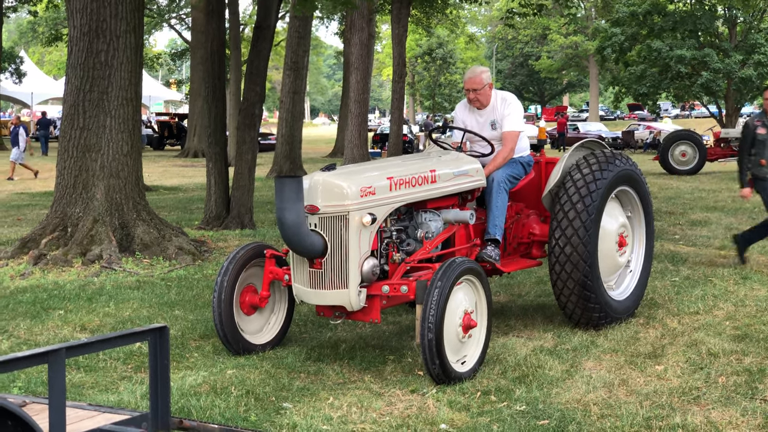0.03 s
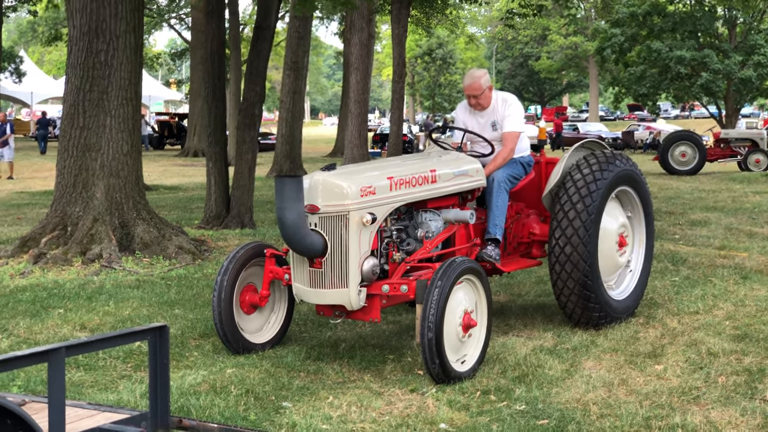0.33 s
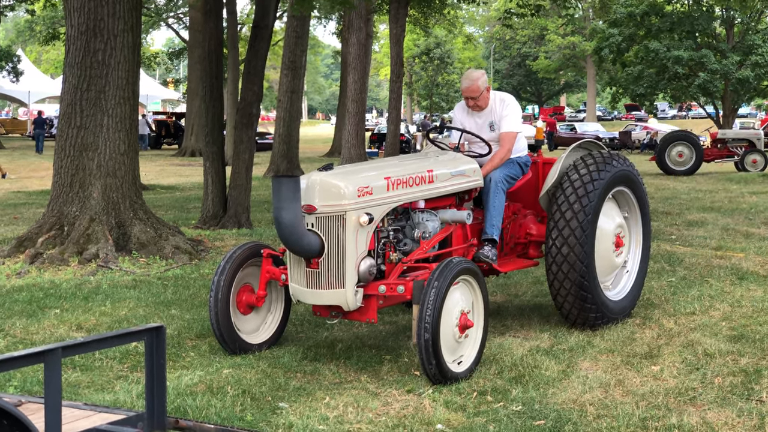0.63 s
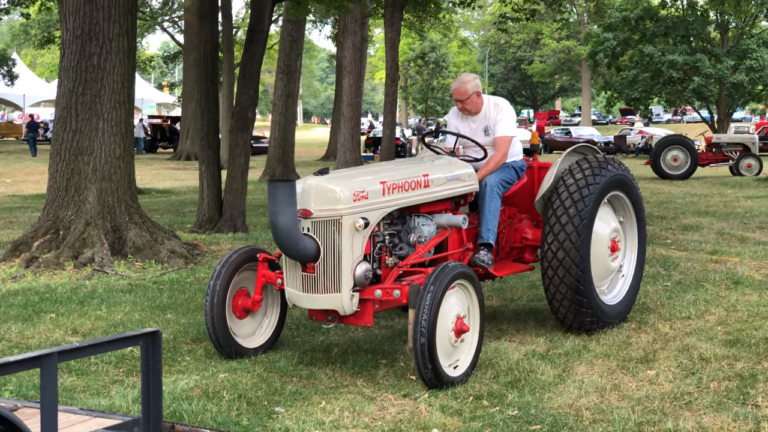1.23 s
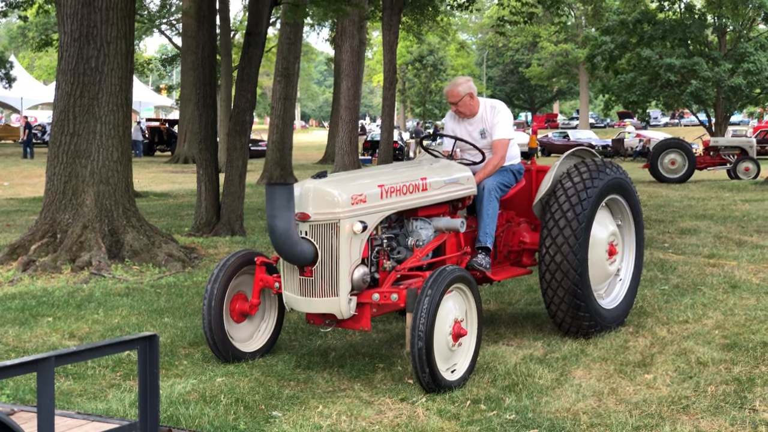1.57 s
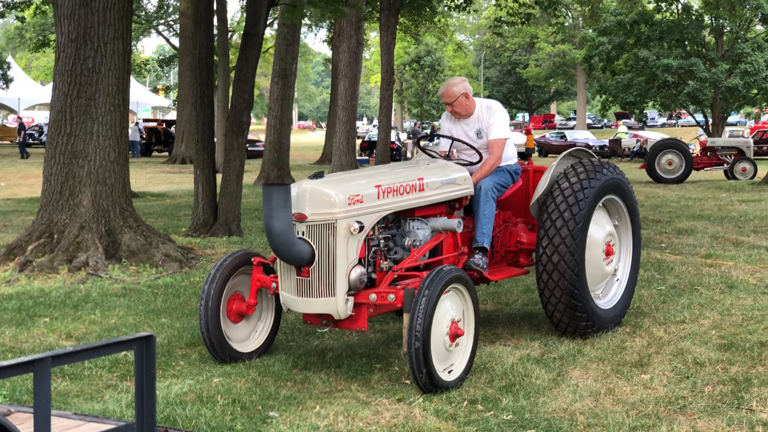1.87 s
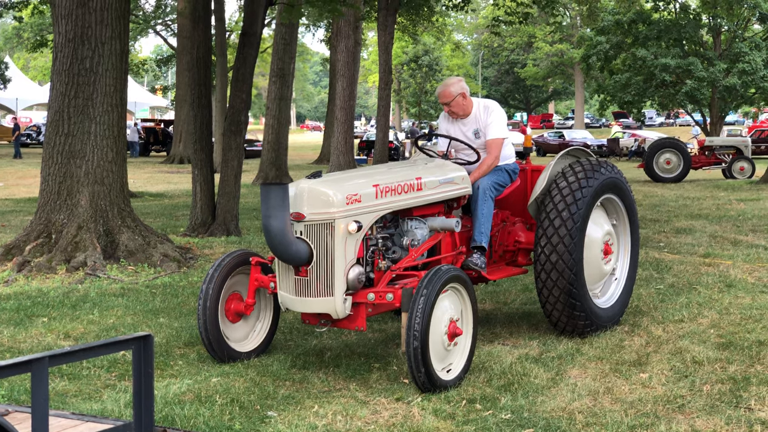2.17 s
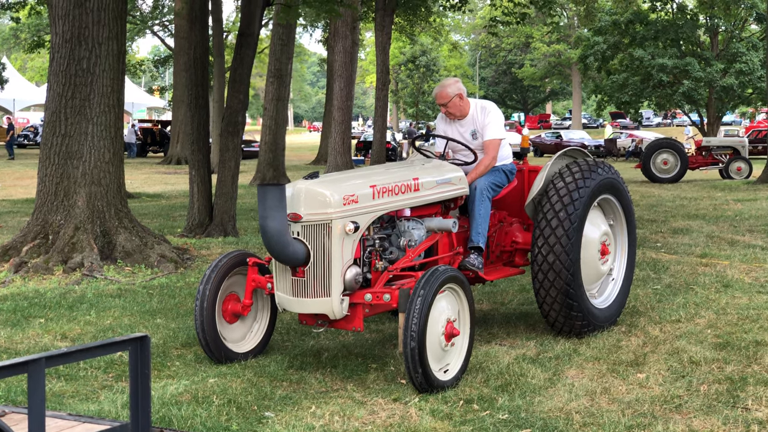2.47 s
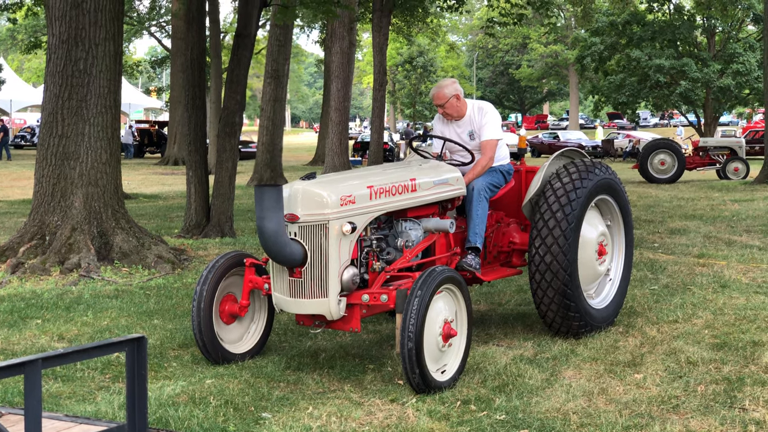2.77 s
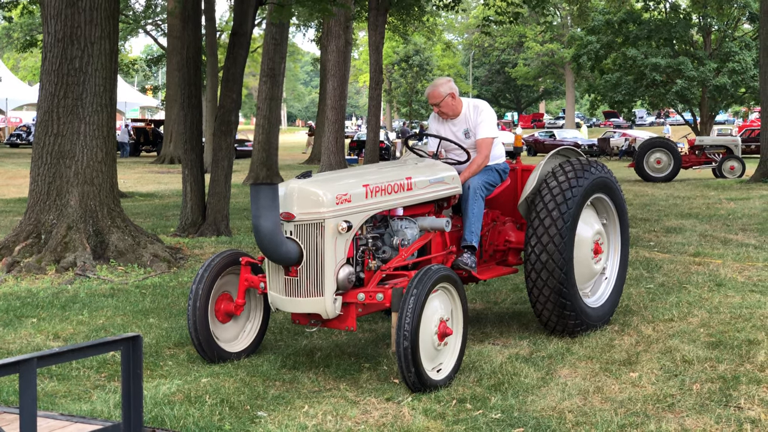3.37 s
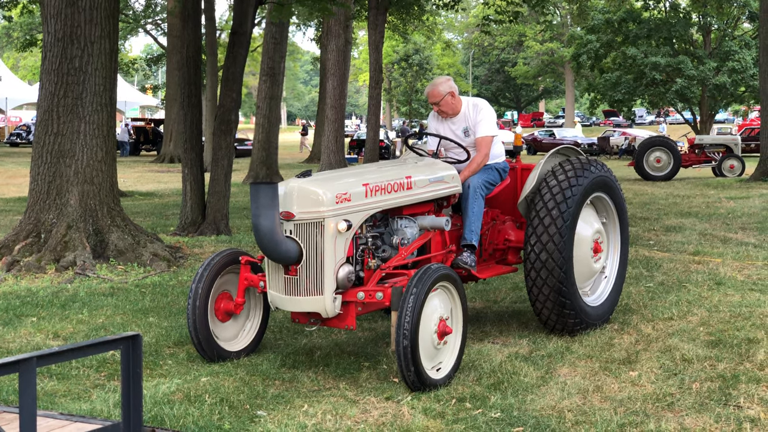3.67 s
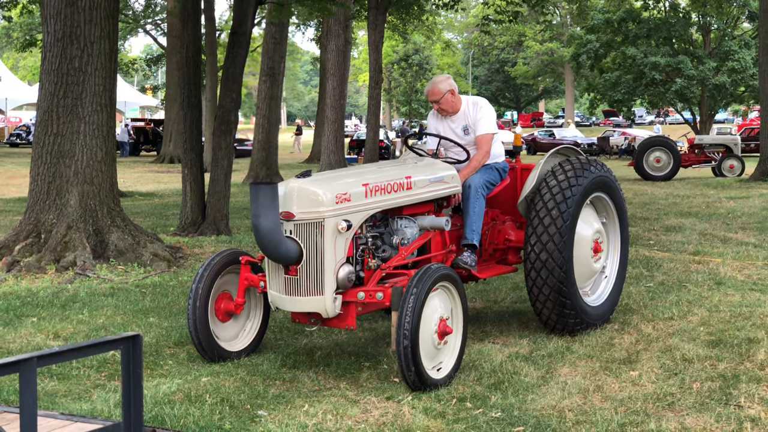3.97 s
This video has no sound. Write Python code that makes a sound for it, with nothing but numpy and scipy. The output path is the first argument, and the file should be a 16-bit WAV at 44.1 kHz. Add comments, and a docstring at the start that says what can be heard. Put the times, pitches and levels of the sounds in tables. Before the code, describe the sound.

A small gas turbine in a tractor spools up on a lawn, a few metres away. From the start, a high whine climbs over a steady rushing roar and hiss, rising about an octave in four seconds. The whine flutters in and out, strengthens from about 1.7 seconds and is loudest around 2.7 to 3.3. Faint low hums lie underneath, and a thin, higher whistle emerges near 3.5 seconds.

```python
"""On a lawn, a few metres away, a small gas turbine in a tractor spools up.
The compressor's blade-passing whine climbs with the shaft, swelling and fading as it sweeps.
Turbulent gas in the ducts makes the exhaust roar and intake hiss. Beneath them: weaker shaft orders,
a higher blade whistle, a rasp and low hums. A gain control turns down when the whine peaks."""
import sys
import numpy as np
from scipy import signal
from scipy.fft import rfft, irfft
from scipy.io import wavfile
from scipy.ndimage import uniform_filter1d

SR = 44100
rng = np.random.default_rng(int(sys.argv[2]) if len(sys.argv) > 2 else 0)


def master_out(mix):
    """Clip the mix to full scale and print it as 16-bit PCM to the path in sys.argv[1]."""
    frames = np.transpose(np.atleast_2d(mix))
    ceiling = np.clip(frames, -1, 1)
    pcm = np.round(ceiling * 32767).astype(np.int16)
    wavfile.write(sys.argv[1], SR, pcm)


N = 176400
TIME_S = np.arange(N) / SR

# shaft speed: time_s, speed_rev_per_s
SHAFT_SPEED = [(0, 176.0), (0.1, 181), (0.25, 192), (0.5, 204.5), (0.8, 219), (1.1, 230), (1.5, 247.7),
               (1.9, 262), (2.3, 276.2), (2.75, 292.6), (3.05, 302.2), (3.3, 311.2), (3.58, 322),
               (3.8, 331.8), (4, 339.6)]
# blade-passing whine: time_s, level_db
WHINE_LEVEL = [(.02, -25), (.065, -36), (.13, -27), (.24, -40), (.33, -23), (.41, -19.5), (.45, -22),
               (.54, -19), (.63, -25), (.73, -23.5), (.765, -39), (.81, -29.5), (1.09, -28), (1.15, -37),
               (1.21, -25.5), (1.33, -33), (1.44, -40), (1.52, -29.5), (1.58, -21.5), (1.63, -48),
               (1.68, -19.5), (1.72, -18.5), (1.78, -28.5), (1.83, -19.5), (1.89, -16.5), (1.93, -19.5),
               (1.975, -15), (2.02, -30.5), (2.12, -18.5), (2.18, -30), (2.23, -16.5), (2.31, -14.5),
               (2.35, -19.5), (2.54, -12), (2.62, -26.5), (2.68, -8), (2.8, -5.5), (2.86, -10.5),
               (2.95, -10), (3.06, -10.5), (3.097, -20.5), (3.12, -10.5), (3.18, -8), (3.23, -11),
               (3.29, -11), (3.34, -27), (3.41, -13.5), (3.56, -23), (3.68, -15), (3.74, -17), (3.795, -12),
               (3.89, -15), (3.945, -14), (3.99, -20.5)]
# octave of the whine: time_s, level_db
OCTAVE_LEVEL = [(0, -44), (.25, -40), (.42, -37), (.47, -24.5), (.55, -27), (.65, -43), (.92, -34.5),
                (1, -31), (1.18, -37), (1.5, -39), (1.62, -25), (1.75, -35.5), (1.88, -42), (1.94, -34.5),
                (2.25, -36), (2.33, -30.5), (2.58, -33.5), (2.68, -23.5), (2.82, -28), (2.9, -24),
                (3.18, -28.5), (3.24, -39), (3.33, -30.5), (3.62, -35), (3.77, -24), (3.86, -41),
                (3.96, -26.5)]
# exhaust roar and intake hiss: frequency_hz, relative_density_db
ROAR_SPECTRUM = [(20, -52), (40, -26), (58, -1.5), (95, -1.5), (120, -4), (170, -7.5), (225, -2.5),
                 (260, -7.5), (310, -13), (430, -17), (520, -4.5), (660, -7), (800, -11), (920, -7.5),
                 (1120, -10), (1290, -8), (1460, -16), (1650, -8.5), (2100, -13), (2700, -15.5),
                 (3100, -13), (3500, -13.5), (4000, -11.5), (4700, -10.5), (5500, -14.5), (6200, -12),
                 (7100, -18.5), (9000, -18), (11000, -24.5), (15500, -28.5)]
# spectral change with shaft speed: frequency_hz, db_per_doubling
ROAR_TILT = [(60, -9), (300, -1), (600, -5), (1200, -1), (2500, -3.5), (4200, 1), (6000, -0.5), (9000, 5.5),
             (15000, 8)]
# roar: time_s, level_db
ROAR_LEVEL = [(0, -27.5), (.6, -27.5), (1.2, -25.5), (2, -24.5), (2.6, -23.5), (3, -23.5), (3.5, -24.5),
              (4, -24.5)]
# weaker tones: multiple of shaft speed
ORDERS = [.578, 1, 2, 16, 23, 24, 45, 46, 60]
# one row per order: level_db at nine even steps, start to end
ORDER_LEVELS = [(-42, -52, -51, -37, -46, -39, -41, -34.5, -31.5),
                (-43, -46.5, -37, -49, -41, -47, -50, -61.5, -42),
                (-52, -59, -55, -61, -37, -60, -52, -44, -46),
                (-60, -48, -53, -54, -57, -39, -36, -57, -48),
                (-40.5, -41, -43, -41, -47, -52, -50, -49, -54),
                (-51, -40, -43, -47, -41, -37, -46, -47, -47),
                (-50, -45, -51, -56, -43, -40, -41, -42, -41),
                (-39, -55, -46, -46, -57, -49, -60, -60, -65),
                (-56, -52, -51, -50, -53, -60, -60, -60, -60)]
# higher blade row: time_s, level_db
WHISTLE_LEVEL = [(0, -60), (.45, -55), (.65, -42.5), (1.1, -42), (1.25, -50), (1.7, -48), (2.1, -55),
                 (2.9, -54), (3.2, -42), (3.48, -47), (3.53, -34), (3.75, -32.5), (4, -35)]
# raspy hiss: time_s, level_db
RASP_LEVEL = [(0, -45), (.3, -42), (.6, -42), (.9, -33.5), (1.15, -42), (1.6, -44), (2.2, -54), (4, -60)]
# hollow swell in the roar: time_s, level_db
DUCT_LEVEL = [(0, -61), (2.8, -41), (3.2, -39), (3.5, -34.5), (3.75, -35.5), (4, -40)]
# low drone: time_s, level_db
DRONE_LEVEL = [(0, -50), (1.2, -46), (1.6, -39), (2.05, -31.5), (2.5, -38.5), (2.9, -37), (3.5, -36.5),
               (4, -48)]
# low rumble: time_s, level_db
RUMBLE_LEVEL = [(0, -50), (1.05, -43), (1.25, -36.5), (1.65, -36), (1.85, -52), (2.3, -57), (2.5, -42),
                (3.2, -47), (3.45, -37.5), (3.75, -40.5), (4, -59)]
# two brief rising hums, one curve each: time_s, pitch_hz, level_db
HUM_GLIDES = [
    [(.2, 128.5, -60), (.35, 133.8, -41), (.5, 138.3, -37), (.62, 158.5, -38.5), (.8, 161.8, -44),
     (.95, 165, -60)],
    [(2.4, 57.93, -58), (2.7, 64.43, -43), (2.95, 72, -35), (3.2, 81, -34), (3.4, 81.95, -58)],
]


def amp(db):
    """Decibels to gain."""
    return 10 ** (np.asarray(db) / 20)


def unit_rms(x):
    """Scales to rms 1."""
    return x / np.sqrt(np.mean(abs(x) ** 2) + 1e-20)


def over_time(points):
    """Table interpolated at every sample."""
    return np.interp(TIME_S, *np.transpose(points))


def over_hz(points, hz):
    """Table interpolated over log frequency."""
    point_hz, values = np.transpose(points)
    return np.interp(np.log(hz + 1), np.log(point_hz), values)


def notched_gain(points):
    """Levels joined linearly in pressure, so fades are narrow notches."""
    time_s, level_db = np.transpose(points)
    return np.interp(TIME_S, time_s, amp(level_db))


def wander(rate_hz):
    """Random motion of rms 1, up to about rate_hz."""
    hz = np.fft.rfftfreq(N, 1 / SR)
    spectrum = rfft(rng.standard_normal(N)) / np.sqrt(1 + (hz / rate_hz) ** 4)
    return unit_rms(irfft(spectrum, N))


def tone(hz, rough, width_hz, steady=1):
    """Tone of rms 1, shaken in strength and phase."""
    shake = (wander(width_hz) + 1j * wander(width_hz)) / np.sqrt(2)
    cycles = np.cumsum(hz * np.ones(N)) / SR
    return unit_rms(((steady + rough * shake) * np.exp(2j * np.pi * cycles)).real)


def noise_band(hz, width_hz):
    """Noise of rms 1, about width_hz to each side of hz."""
    return tone(hz, 1, width_hz, steady=0)


def compressor(shaft_hz, blades=15, flutter=0.17, flutter_hz=65.4):
    """Blade-passing whine shaken by turbulence, its air-scattered skirt and a shimmering octave."""
    blade_hz = blades * shaft_hz
    whine = notched_gain(WHINE_LEVEL) * tone(blade_hz, flutter, flutter_hz)
    skirt = amp(-39.5) * noise_band(blade_hz, width_hz=58.7)  # heard in the fades
    shimmer = unit_rms(1 + 0.32 * wander(rate_hz=7.6))
    octave = amp(over_time(OCTAVE_LEVEL)) * shimmer * tone(2 * blade_hz, 2 * flutter, flutter_hz)
    return whine + skirt + octave


def roar(shaft_hz, patch_db=0.4, swell_db=0.28):
    """Turbulent gas in fixed duct resonances; the hiss brightens with speed."""
    framing = dict(fs=SR, nperseg=2048, noverlap=1536)
    hz, frame_s, noise = signal.stft(rng.standard_normal(N), **framing)
    doublings = np.log2(np.interp(frame_s, TIME_S, shaft_hz) / shaft_hz.mean())
    patches = uniform_filter1d(rng.standard_normal(noise.shape), size=16, axis=0)
    patches = unit_rms(uniform_filter1d(patches, size=9, axis=1))
    tilt_db = over_hz(ROAR_TILT, hz)[:, None] * doublings
    shape_db = over_hz(ROAR_SPECTRUM, hz)[:, None] + tilt_db + patch_db * patches
    gas = signal.istft(noise * amp(shape_db), **framing)[1][:N]
    return unit_rms(gas) * amp(over_time(ROAR_LEVEL) + swell_db * wander(rate_hz=12))


def shaft_orders(shaft_hz, fade_db=1.5, ring_hz=10930, ring_half_width_hz=110, ring_db=8):
    """Gear, rotor and blade tones; those crossing a fixed high resonance flare."""
    out = np.zeros(N)
    for order, levels_db in zip(ORDERS, ORDER_LEVELS):
        hz = order * shaft_hz
        step_s = np.linspace(0, TIME_S[-1], len(levels_db))
        level_db = np.interp(TIME_S, step_s, levels_db) + fade_db * wander(rate_hz=7)
        level_db += ring_db / (1 + ((hz - ring_hz) / ring_half_width_hz) ** 2)
        out += amp(level_db) * tone(hz, rough=0.37 * order ** 0.16, width_hz=4 * np.sqrt(order))
    return out


def whistle(shaft_hz, order=36):
    """A higher blade row, loudest near the end."""
    return notched_gain(WHISTLE_LEVEL) * tone(order * shaft_hz, rough=0.41, width_hz=34)


def rasp(shaft_hz, order=22.7):
    """Band of hiss climbing with the shaft."""
    return amp(over_time(RASP_LEVEL)) * noise_band(order * shaft_hz, width_hz=160)


def duct_swell():
    """Hollow band in the roar, swelling late."""
    return amp(over_time(DUCT_LEVEL)) * noise_band(hz=617, width_hz=49)


def low_hums():
    """Rumble and drone at fixed pitch, plus two brief rising hums."""
    out = amp(over_time(RUMBLE_LEVEL)) * tone(hz=61.1, rough=0.27, width_hz=3.4)
    out += amp(over_time(DRONE_LEVEL)) * tone(hz=192.3, rough=0.36, width_hz=10)
    for glide in HUM_GLIDES:
        time_s, pitch_hz, level_db = np.transpose(glide)
        gain = np.interp(TIME_S, time_s, amp(level_db), left=0, right=0)
        out += gain * tone(np.interp(TIME_S, time_s, pitch_hz), rough=0.21, width_hz=6.8)
    return out


def scene():
    """One shaft speed drives the turbine, over the hums and duct swell; mono."""
    shaft_hz = over_time(SHAFT_SPEED)
    turbine = compressor(shaft_hz) + whistle(shaft_hz) + rasp(shaft_hz)
    turbine += shaft_orders(shaft_hz) + roar(shaft_hz)
    return (turbine + low_hums() + duct_swell())[None]


def record(dry):
    """Gain control, quick down on peaks and slow back; then band limits."""
    threshold_db, peak_decay_db_per_s, reduction_share = -9.5, 8, 0.78
    low_cut_hz, high_cut_hz = 35, 15800
    power_db = 10 * np.log10(abs(uniform_filter1d(dry[0] ** 2, size=441)) + 1e-12)
    decay_db = TIME_S * peak_decay_db_per_s
    peak_db = np.maximum.accumulate(power_db + decay_db) - decay_db
    excess_db = np.maximum(peak_db - threshold_db, 0)
    ducked = dry / amp(reduction_share * uniform_filter1d(excess_db, size=300))
    highpass = signal.butter(4, low_cut_hz, "high", fs=SR, output="sos")
    lowpass = signal.firwin(511, high_cut_hz, window=("kaiser", 9), fs=SR)
    return signal.oaconvolve(signal.sosfilt(highpass, ducked), lowpass[None], "same")


dry = scene()
out = record(dry)
master_out(out)
```